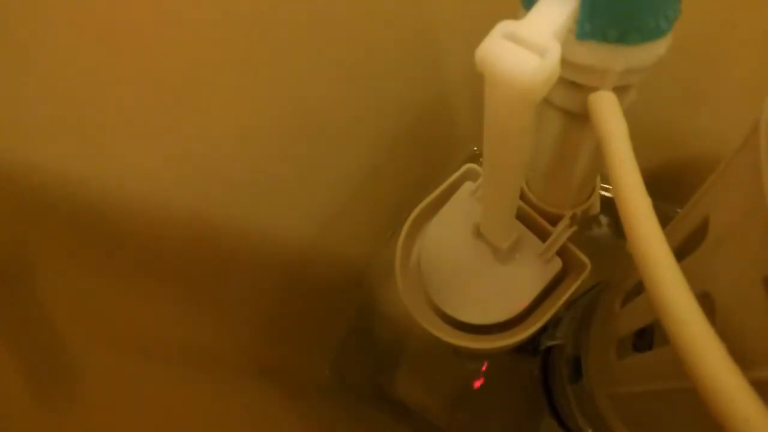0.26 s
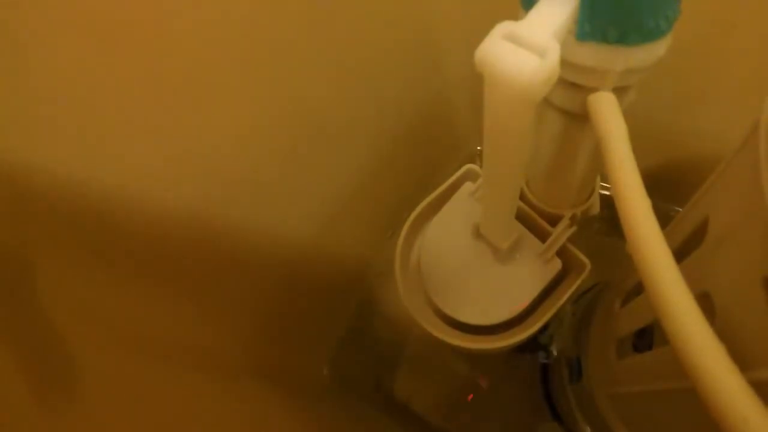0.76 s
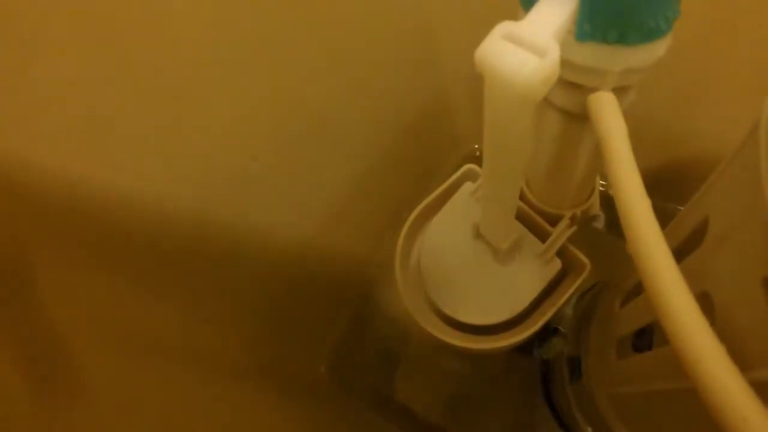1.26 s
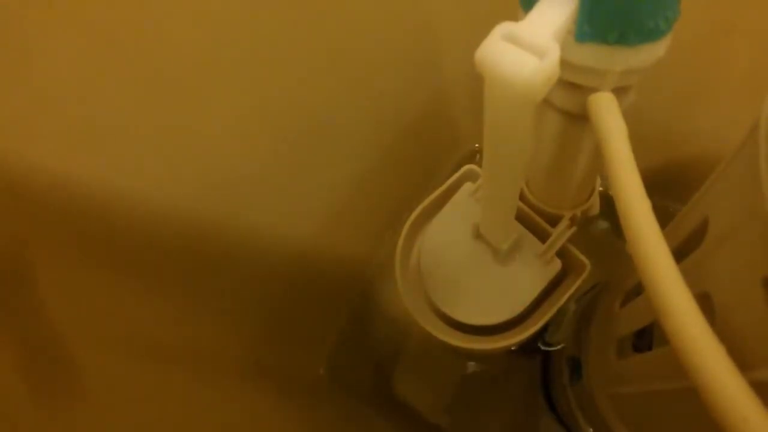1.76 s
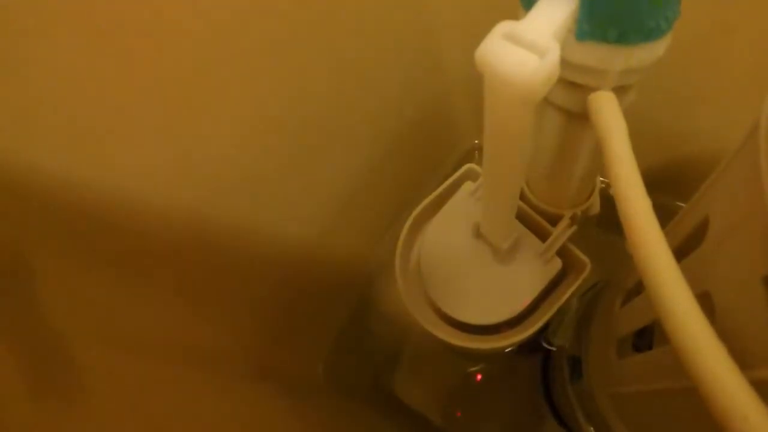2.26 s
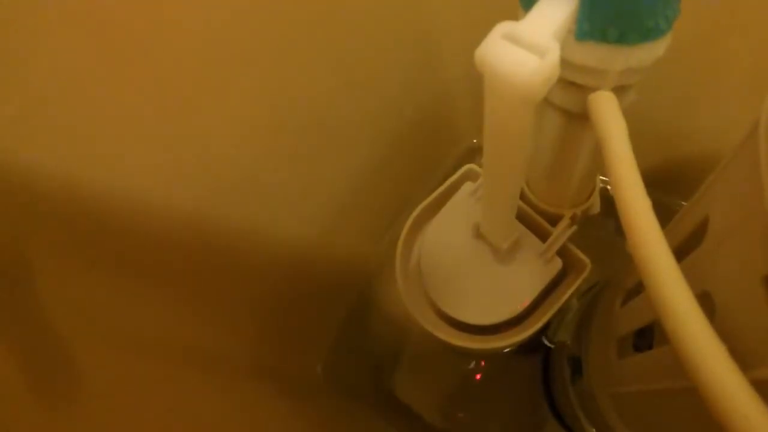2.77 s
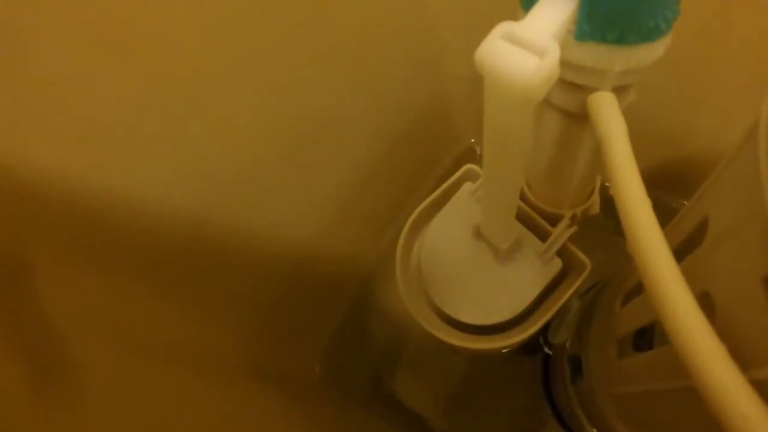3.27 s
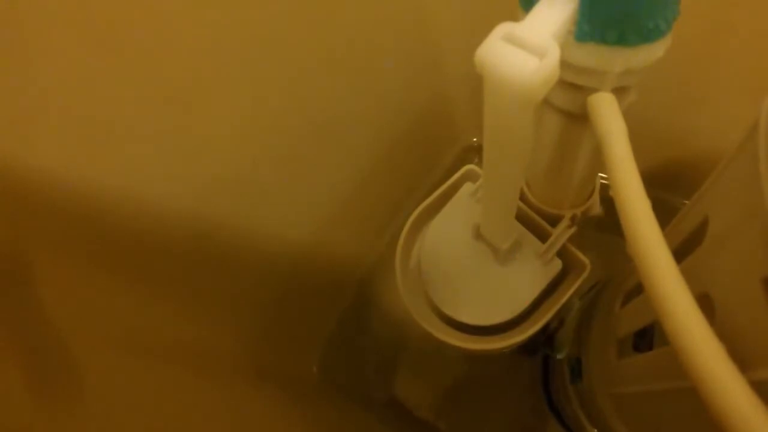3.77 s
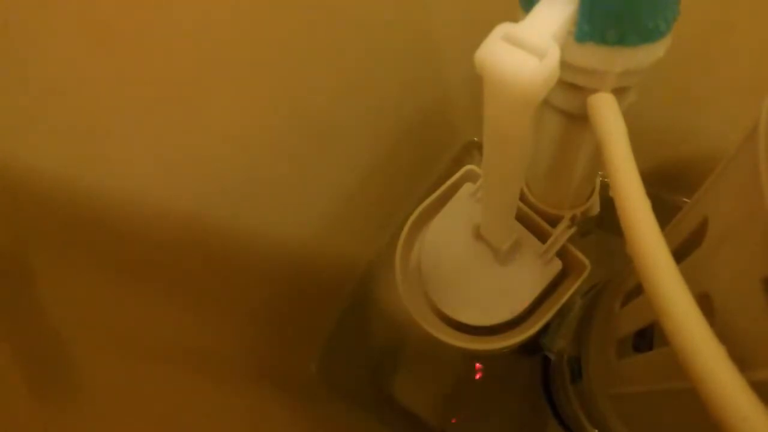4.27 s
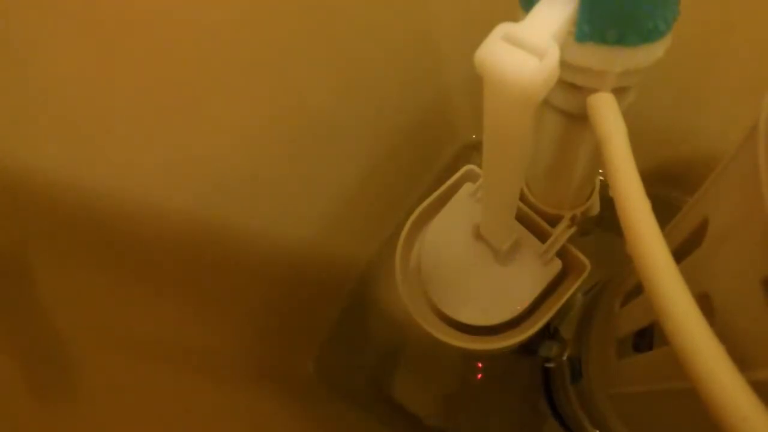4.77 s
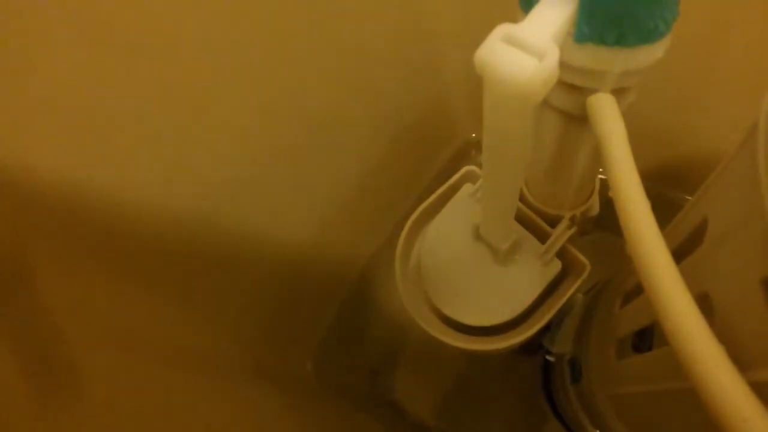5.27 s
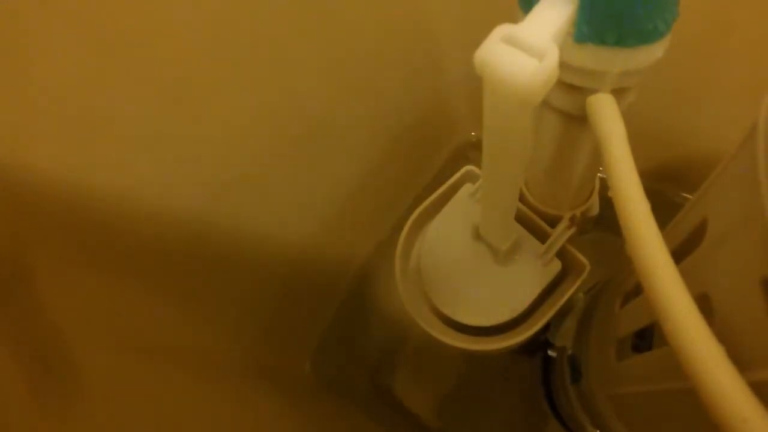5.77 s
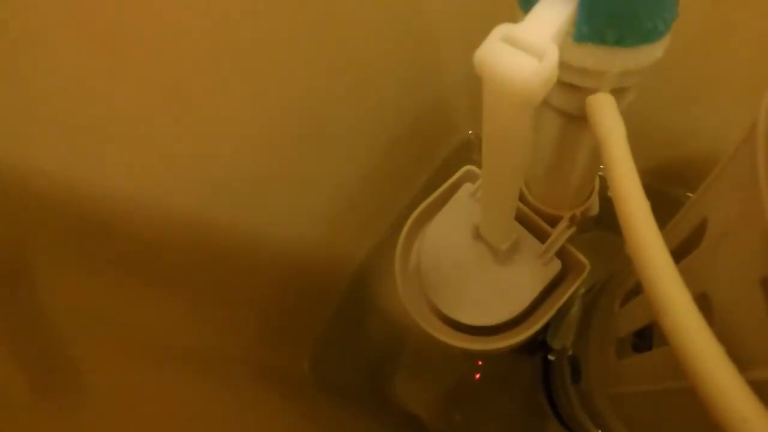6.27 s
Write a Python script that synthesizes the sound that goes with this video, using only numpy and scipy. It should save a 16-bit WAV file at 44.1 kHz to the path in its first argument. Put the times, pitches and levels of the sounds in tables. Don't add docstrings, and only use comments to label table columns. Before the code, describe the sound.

A toilet tank fills without pause, very close and boxy. Turbulent water roars softly through the tank's hollow resonances, with crisp spray and scattered tiny bubble pings on top and faint rumble and gurgling hum below. A noisy whistle from the valve starts high, slides over to a lower band, flares briefly around three and a half seconds and dies away. The last half second has muted handling thumps.

```python
import sys
import numpy as np
from scipy import signal
from scipy.fft import rfft, irfft, next_fast_len
from scipy.io import wavfile
from scipy.ndimage import uniform_filter1d

SR = 44100
rng = np.random.default_rng(int(sys.argv[2]) if len(sys.argv) > 2 else 0)


def wav_out(sig):
    wavfile.write(sys.argv[1], SR, np.round(np.clip(np.atleast_2d(sig).T, -1, 1) * 32767).astype(np.int16))


def amplitude_ratio(level_db):
    exponent = np.asarray(level_db, float) / 20
    return 10 ** exponent


N = 287532
FRAME, HOP = 4096, 1024
FRAMES = N // HOP + 5
HZ = np.fft.rfftfreq(FRAME, 1 / SR)[:, None]

# (start frequency [Hz], end frequency [Hz], width [Hz], start level
# [dB], end level [dB])
TANK_MODES = [(542, 528, 54, -8, -12.5), (593, 594, 87, -9, -11.5), (640, 659, 41, -8, -7.5),
              (687, 667, 27, -12, -10.5), (1054, 1042, 74, -24, -21), (1370, 1370, 63, -11, -9),
              (1460, 1463, 52, -6, -3), (1569, 1530, 46, -0.5, -1), (1618, 1580, 28, -3, -10.5),
              (1702, 1768, 95, -8, -7), (1804, 1792, 24.6, -1.5, -3), (1926, 1966, 31, -13, -6),
              (2020, 2003, 83, -6, -8.5),
              (2226, 2258, 155, -7.5, -8.5), (2294, 2320, 42, -10.5, -14), (2412, 2385, 77, -3, -8.5),
                   (2514, 2470, 49, -9, -3), (2568, 2590, 58, -9, -9), (2677, 2712, 30.5, -9, -6),
                   (2740, 2760, 52, -22, -11), (2950, 2980, 52, -17, -22), (3030, 3062, 83, -17, -15),
                   (3186, 3160, 180, -15, -14.5), (3290, 3250, 31, -13, -25),
                   (3490, 3430, 54, -19.5, -26.5)]
AIR_MODES = TANK_MODES
# (frequency [Hz], width [Hz], lift [dB])
WALL_MODES = [(4100, 83, 1.5), (4220, 57, 8), (4520, 58, 1.5), (4635, 70, 5), (4900, 100, -5),
              (5520, 230, 2), (6050, 96, 8.5), (7110, 160, 7), (8340, 100, 2), (8700, 77, 2.5),
              (9340, 160, 5), (10600, 270, -1), (11600, 180, 4.5), (12300, 97, 4), (12900, 150, -6),
              (14050, 250, 1)]
# (frequency [Hz], density [dB per Hz])
RUMBLE_SPECTRUM = [(13, -13), (22, 1), (43, -6.5), (75, -11), (156, -12.5), (182, -14), (210, -12.5),
                   (290, -14), (330, -17), (480, -23), (620, -57), (1060, -120)]
# (time [s], peak level [dB], frequency [Hz], length [s])
CAMERA_NUDGES = [
    (2.578, -46, 104, 0.026),
    (6.0, -39, 48, 0.053),
    (6.166, -40, 260, 0.012),
    (6.173, -42, 60, 0.053),
    (6.408, -42, 62, 0.029),
]
# (frequency [Hz], density [dB per Hz])
SPRAY_SPECTRUM = [(400, -22), (800, 8.5), (1200, 2), (2800, 0), (3700, 0.5), (5900, 1), (6500, -8.5),
                  (7800, -12.5), (9400, -10), (10400, -10.5), (11000, -15.5), (12400, -14), (13500, -18),
                  (15400, -20)]
# (time [s], peak level [dB], pitch [Hz], skin snap level [dB])
SMALL_BUBBLES = [(0.0174, -45, 9300, -68), (0.0754, -37, 10800, -51), (0.3047, -44, 8500, -54),
                 (0.449, -41, 8700, -64), (0.826, -37, 8900, -70), (0.9073, -41, 11500, -62),
                 (0.96, -42.5, 9900, -70), (1.233, -30.5, 9900, -61), (1.7923, -47, 9100, -66),
                 (1.9679, -40, 9500, -66), (2.0168, -47, 9440, -67), (2.4818, -41, 9500, -63),
                 (2.6324, -41.5, 8700, -68), (2.7152, -40, 9300, -64), (2.738, -36.5, 9300, -61),
                 (2.8125, -47, 9650, -70), (3.1158, -42, 9100, -63), (3.247, -41.5, 9470, -64),
                 (3.5313, -34, 8700, -63), (3.8666, -45, 11500, -57), (4.092, -37.5, 9100, -60),
                 (4.314, -46, 9500, -63), (5.002, -45, 9500, -67), (5.1178, -43, 10600, -67),
                 (5.2729, -38, 8830, -58), (5.448, -41, 9400, -60), (5.559, -38, 10600, -65),
                 (5.6875, -43, 10100, -66), (5.9025, -41, 9400, -56), (6.383, -39, 9200, -59)]
# (time [s], peak level [dB], pitch [Hz])
LARGE_BUBBLES = [(0.463, -42, 4600), (0.5402, -39, 4540), (0.7512, -46, 5970), (1.2326, -44, 5560),
                 (2.4817, -42, 4570), (3.2475, -44, 4470), (3.4216, -44, 4360), (3.4257, -39, 4960),
                 (3.4525, -39, 6050), (4.1255, -40, 4640), (4.774, -42.5, 4280), (5.232, -42, 6000),
                 (5.654, -43, 4470), (5.74, -43, 4380), (5.8536, -45, 3810), (5.903, -37, 5740),
                 (6.077, -42.5, 5870)]
# (peak time [s], peak level [dB], reach [s])
JET_SURGES = [(0.03, -50, 0.3), (.29, -46.5, 0.056), (.4, -51.5, 0.13), (.66, -48.5, 0.07),
              (.78, -48, 0.021), (.87, -50, 0.06), (1.08, -51, 0.088), (1.27, -50, 0.036),
              (1.55, -54, 0.41), (1.85, -51, 0.049), (1.96, -51, 0.14), (2.13, -55.5, 0.076),
              (2.33, -49.5, .2), (2.59, -52, 0.075), (2.82, -54, 0.069), (2.97, -50.5, 0.13),
              (3.1, -47, 0.058), (3.37, -49.5, 0.095), (3.51, -50.5, 0.067), (3.76, -47.5, 0.14),
              (4.14, -56, 0.032), (4.64, -48.5, .06), (4.9, -53.5, 0.075), (5.4, -61.5, .2),
              (5.7, -53.5, 0.17), (5.95, -55.5, 0.73), (6.24, -48.5, 0.078), (6.371, -46, 0.03),
              (6.479, -44, 0.026)]
# (time [s], level [dB], centre frequency [Hz])
HIGH_WHINE = [
    (0, -47.5, 2350),
    (.19, -48.5, 2480),
    (.31, -41.5, 2480),
    (.47, -42.5, 2480),
    (.67, -38.5, 2390),
    (.77, -44.5, 2300),
    (.92, -45.5, 2330),
    (1.2, -53.5, 2500),
    (2.2, -54, 2470),
]
# (time [s], level [dB], centre frequency [Hz])
LOW_WHINE = [
    (.5, -70, 1610),
    (.7, -49, 1655),
    (1.2, -43.5, 1540),
    (1.7, -42.5, 1502),
    (2.2, -45.5, 1455),
    (2.7, -42, 1460),
    (3.1, -45, 1494),
    (3.3, -52.5, 1550),
    (3.45, -66, 1500),
]
# (time [s], level [dB], centre frequency [Hz])
OVER_WHINE = [
    (2.5, -75, 3050),
    (2.9, -57, 3100),
    (3.5, -58.5, 3200),
    (4.15, -58.5, 3170),
    (4.4, -82, 3050),
]
# (time [s], level [dB], centre frequency [Hz])
THIN_WHINE = [
    (2.4, -84, 1030),
    (2.9, -71, 1050),
    (4.2, -64.5, 1054),
    (4.6, -65, 1057),
    (6.52, -66.5, 1060),
]
# (time [s], level [dB], centre frequency [Hz])
GURGLE = [
    (0, -72, 640),
    (1.4, -57.5, 670),
    (2.4, -57.5, 666),
    (5.4, -61, 643),
    (6.52, -71, 650),
]
# (peak time [s], level [dB], centre frequency [Hz], band width [Hz])
VALVE_FLARES = [
    (1.7, -50.5, 2470, 300),
    (3.47, -47, 2420, 500),
    (3.56, -48, 1530, 224),
]


def evened(x):
    return x / np.sqrt(np.mean(x ** 2) + 1e-20)


def drift(seconds):
    span = max(int(seconds * SR / 2), 1)
    once = uniform_filter1d(rng.standard_normal(N), size=span)
    return evened(uniform_filter1d(once, size=span))


def read(points, hz):
    f, value = np.transpose(points)
    return np.interp(np.log(hz + 1), np.log(f + 1), value)


def add(mix, s, sound):
    part = mix[round(s * SR):][:len(sound)]
    part += sound[:len(part)]


def noise(magnitude):
    real, imaginary = rng.standard_normal((FRAMES, len(HZ), 2)).T
    spectra = (real + 1j * imaginary) * magnitude
    return evened(signal.istft(spectra, nperseg=FRAME, noverlap=FRAME - HOP)[1][:N])


def hump(hz, width, steep):
    return (1 + (2 * (HZ - hz) / width) ** 2) ** -steep


def air_modes(steep=1.67, patchy_db=1.56):
    fill = np.linspace(0, 1, FRAMES)
    sways = rng.standard_normal((FRAMES, len(AIR_MODES)))
    sways = evened(uniform_filter1d(sways, size=8, axis=0)).T
    power = 0
    for (hz0, hz1, width, db0, db1), sway in zip(AIR_MODES, sways):
        level_db = db0 + (db1 - db0) * fill + patchy_db * sway
        power = power + amplitude_ratio(2 * level_db) * hump(hz0 + (hz1 - hz0) * fill, width, steep)
    return np.sqrt(power)


def coloured(x, spectrum):
    size = next_fast_len(N)
    hz = np.fft.rfftfreq(size, 1 / SR)
    colour = amplitude_ratio(read(spectrum, hz)) + 0j
    for f, width, lift_db in WALL_MODES:
        colour *= 1 + (amplitude_ratio(lift_db) - 1) / (1 + 2j * (hz - f) / width)
    return irfft(rfft(x, size) * colour, size)[:N]


def walls(x, t60=0.07, wet_db=-2, turns_per_s=3.1):
    t = np.arange(SR // 8) / SR
    tails = rng.standard_normal((len(t), 3)).T * amplitude_ratio(-60 * t / t60) * (t > 0.0008)
    tails /= np.linalg.norm(tails[0])
    turn = np.pi * (turns_per_s * np.arange(N) / SR + np.arange(3)[:, None] / 3)
    shares = np.sqrt(2 / 3) * np.cos(turn) * x
    return x + amplitude_ratio(wet_db) * signal.fftconvolve(shares, tails, axes=1).sum(0)[:N]


def ping(hz, turns, rise):
    u = np.arange(400) / SR * hz / turns
    return np.sin(2 * np.pi * turns * u * (1 + rise * u)) * 1.82 * u ** 2 * np.exp(-u)


def rumble(level_db=-56.5):
    return amplitude_ratio(level_db) * noise(amplitude_ratio(read(RUMBLE_SPECTRUM, HZ)))


def nudges(sag=0.27):
    out = np.zeros(N)
    for s, db, hz, length in CAMERA_NUDGES:
        t = np.arange(0, length, 1 / SR)
        push = np.sin(2 * np.pi * hz * t * (1 - sag * t / length)) * np.hanning(len(t))
        add(out, s, -amplitude_ratio(db) * push)
    return out


def fizz(gust, per_s=600, spread_db=3.5):
    chance, kind, big = rng.random((N, 3)).T
    size_db = spread_db * np.minimum(-np.log(big + 1e-9), 4)
    train = amplitude_ratio(size_db) * (chance < per_s / SR * amplitude_ratio(4 * gust))
    pitches = np.geomspace(4000, 15000, 24)
    kind = (kind * len(pitches)).astype(int)
    out = np.zeros(N)
    for k, hz in enumerate(pitches):
        out += signal.oaconvolve(train * (kind == k), ping(hz, 2.4, 0.012))[:N] * (hz / 9000) ** 1.85
    return evened(walls(out))


def sputter(gust, depth_db=6.5, drift_db=1.5, drift_s=0.17):
    upper_gust = evened(gust + 1.5 * drift(0.0056))
    treble_band = signal.butter(3, [7800, 10900], "band", fs=SR, output="sos")
    top_band = signal.butter(4, 10900, "high", fs=SR, output="sos")
    treble = signal.sosfilt(treble_band, rng.standard_normal(N))
    top = signal.sosfilt(top_band, rng.standard_normal(N))
    treble *= amplitude_ratio(depth_db * gust + drift_db * drift(drift_s))
    top *= amplitude_ratio(2.8 * upper_gust - 0.5)
    return evened(walls(treble + top, t60=0.035, wet_db=-9))


def spray(level_db=-56.5, fizz_db=-3, sputter_db=-1):
    gust = uniform_filter1d(rng.standard_normal(N), size=170)
    gust = evened(uniform_filter1d(gust, size=90))
    wet = rng.standard_normal(N) + amplitude_ratio(sputter_db) * sputter(gust) + amplitude_ratio(fizz_db) * fizz(gust)
    return amplitude_ratio(level_db) * evened(coloured(wet, SPRAY_SPECTRUM))


def crowd(count=170, per_clump=2):
    where, size, pitch, snap = rng.standard_normal((count, 4, 1)).transpose(1, 0, 2)
    lag, own, tune = rng.standard_normal((count, per_clump, 3)).transpose(2, 0, 1)
    slot = np.arange(count)[:, None] + 0.5 + 0.5 * np.sin(10 * where)
    s = slot * N / SR / count + 0.012 * abs(lag)
    db = -54 + 0.5 * np.clip(size + own, -3, 2)
    hz = 9400 * np.exp(0.065 * pitch + 0.042 * tune)
    snap_db = -71.5 + 4 * np.clip(snap + own, -3, 2)
    return list(np.reshape([s, db, hz, snap_db], (4, -1)).T)


def bubbles(ragged=1.0, snap_hz=12800):
    out = np.zeros(N)
    small = [tuple(row) for row in SMALL_BUBBLES] + crowd()
    torn = rng.standard_normal((len(small) + len(LARGE_BUBBLES), 400))
    torn = 1 + ragged * evened(uniform_filter1d(torn, size=19, axis=1))
    for (s, db, hz, snap_db), rag in zip(small, torn):
        body = amplitude_ratio(db - 9) * ping(hz, 3.86, 0.0056)
        snap = amplitude_ratio(snap_db + 7.5) * ping(snap_hz, 5.6, 0.002)
        add(out, s, rag * (body + snap))
    for (s, db, hz), rag in zip(LARGE_BUBBLES, torn[::-1]):
        add(out, s, rag * amplitude_ratio(db - 10.5) * ping(0.96 * hz, 3.0, 0.02))
    spectrum = [(3000, 5), (7500, -1.5), (9000, 0.5), (15000, -7.5)]  # (Hz, dB)
    return coloured(walls(out, t60=0.035, wet_db=0.5), spectrum)


def hum(mode_hz=530, wander_hz=9.13, reach_drop_db=12):
    t = np.arange(0, N + 64, 64) / SR
    power = sum(amplitude_ratio(2 * (db - reach_drop_db * abs(t - s) / reach)) for s, db, reach in JET_SURGES)
    swell = np.interp(np.arange(N) / SR, t, np.sqrt(power))
    stray = evened(uniform_filter1d(rng.standard_normal(N), size=1500))
    phase = 2 * np.pi * np.cumsum(mode_hz + wander_hz * stray) / SR
    return np.sqrt(2) * swell * np.sin(phase)


def whine(rows, width, steep, air, boxed):
    s, db, hz = np.transpose(rows)
    centre = np.interp(np.arange(FRAMES) * HOP / SR, s, hz)
    shape = np.sqrt(hump(centre, width, steep)) * air ** boxed
    band = noise(shape / np.linalg.norm(shape, axis=0))
    return band * amplitude_ratio(np.interp(np.arange(N) / SR, s, db, left=-120, right=-120))


def flare(s, db, hz, width, air, rise_s=0.27, fall_s=0.32, drop_db=22):
    rows = [(s - rise_s, db - drop_db, hz), (s, db, hz), (s + fall_s, db - drop_db, hz)]
    return whine(rows, width, 2.3, air, 1.0)


def valve(air, flutter_db=0.8, flutter_s=0.015):
    out = whine(HIGH_WHINE, 500, 3.2, air, 0.53) + whine(LOW_WHINE, 220, 2.36, air, 0.45)
    out += sum(flare(*row, air) for row in VALVE_FLARES)
    out *= amplitude_ratio(flutter_db * drift(flutter_s))
    out += whine(OVER_WHINE, 300, 1.3, air, 0.55)
    out += whine(THIN_WHINE, 45, 1.7, air, 0.092)
    return out + whine(GURGLE, 138, 1.9, air, 0.43)


def jet(air, level_db=-44.5):
    return amplitude_ratio(level_db) * noise(air)


def scene():
    air = air_modes()
    background = rumble() + nudges()
    water = spray() + bubbles()
    return (background + water + hum() + valve(air) + jet(air))[None]


def top_cut(x):
    return signal.sosfilt(signal.butter(12, 15710, fs=SR, output="sos"), x)


def record(dry, leak_db=-29, floor_hz=28, edge_hz=15300):
    bass_cut = signal.butter(1, floor_hz, "high", fs=SR, output="sos")
    dry = signal.sosfilt(bass_cut, dry)
    treble_cut = signal.firwin(401, edge_hz, window=("kaiser", 3), fs=SR)
    low = signal.oaconvolve(dry, treble_cut[None], "same")
    return top_cut(low + amplitude_ratio(leak_db) * (dry - low))


dry = scene()
out = record(dry)
wav_out(out)
```